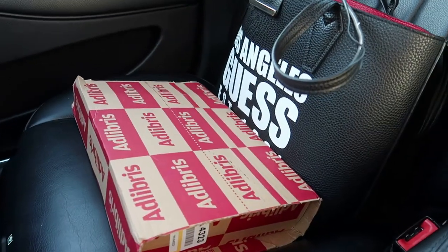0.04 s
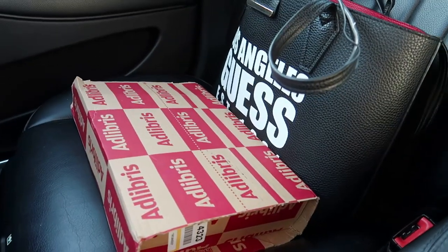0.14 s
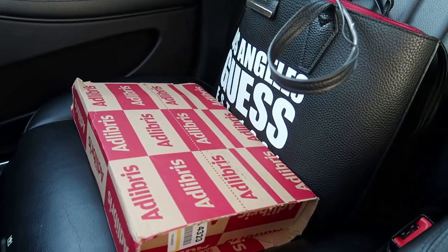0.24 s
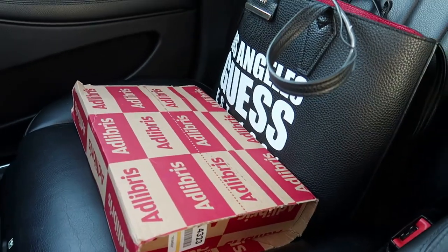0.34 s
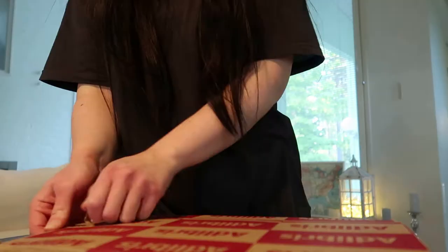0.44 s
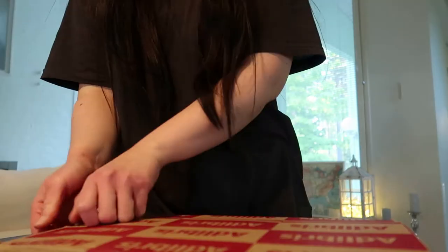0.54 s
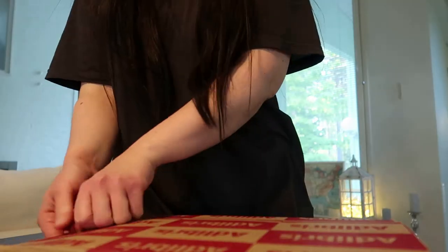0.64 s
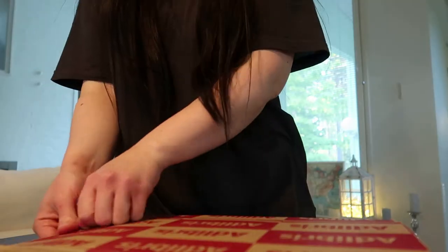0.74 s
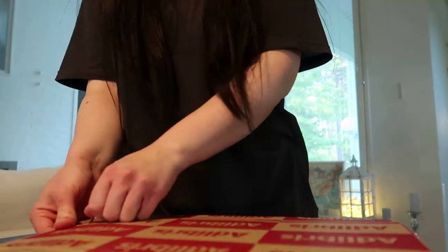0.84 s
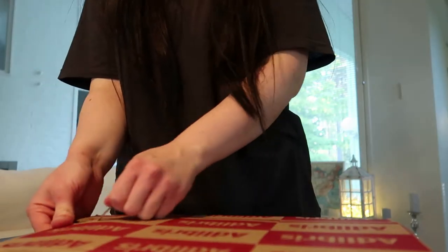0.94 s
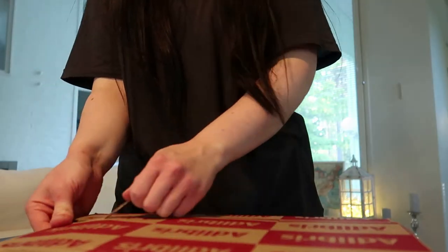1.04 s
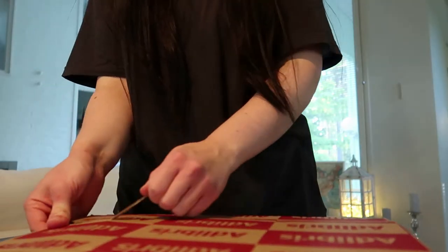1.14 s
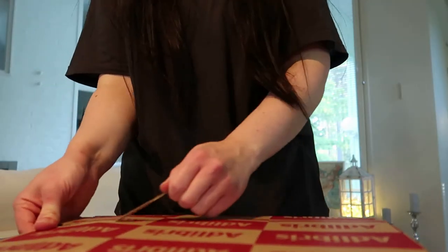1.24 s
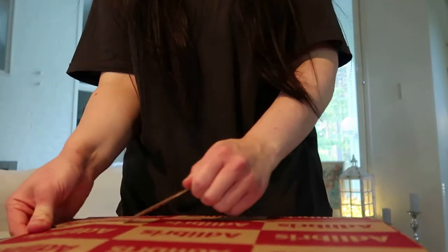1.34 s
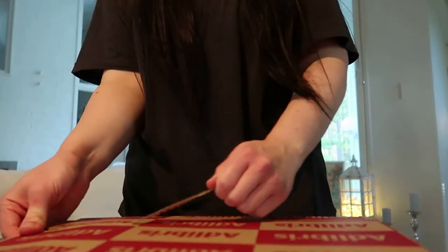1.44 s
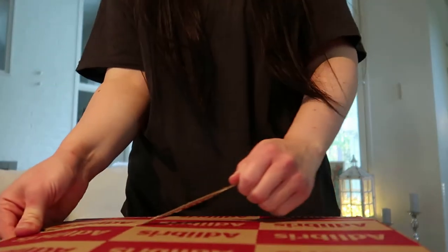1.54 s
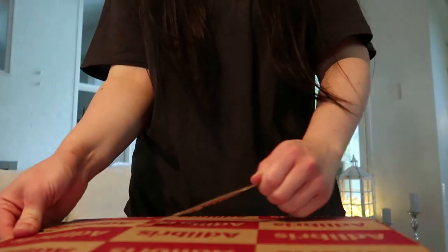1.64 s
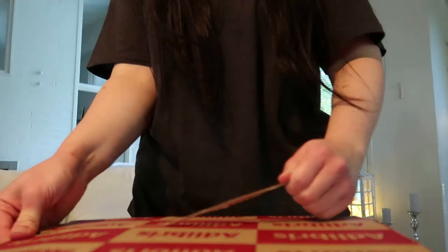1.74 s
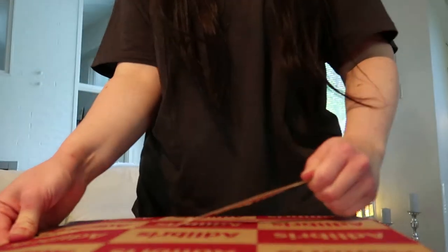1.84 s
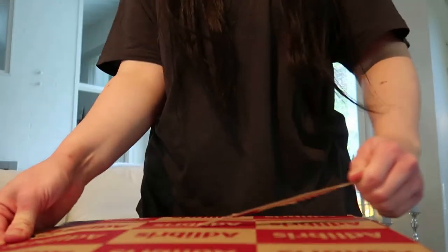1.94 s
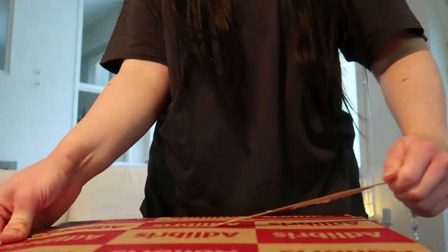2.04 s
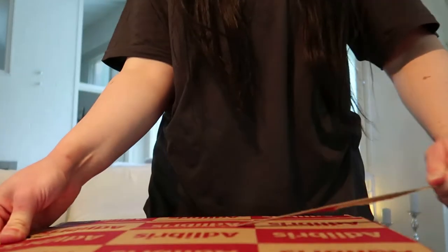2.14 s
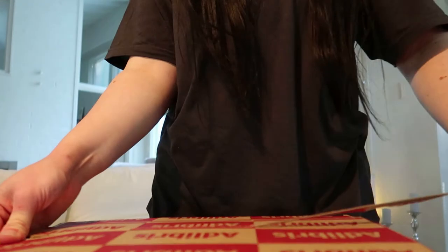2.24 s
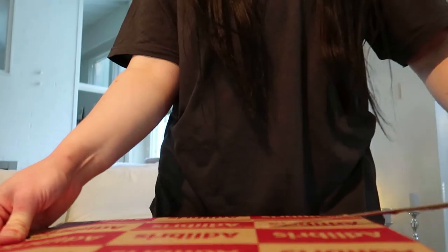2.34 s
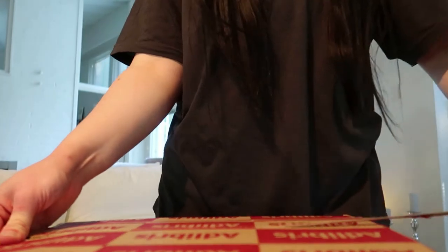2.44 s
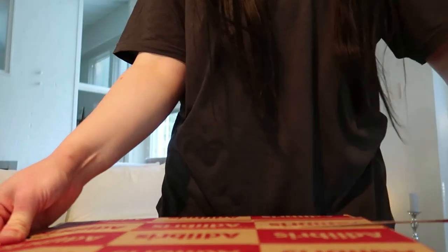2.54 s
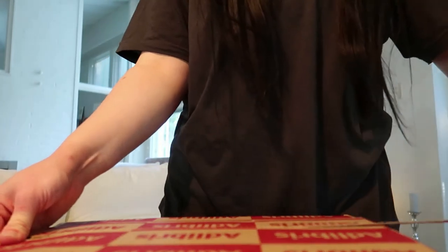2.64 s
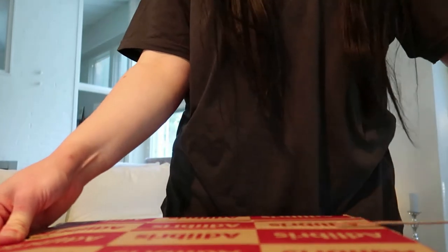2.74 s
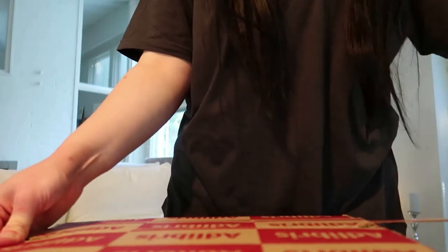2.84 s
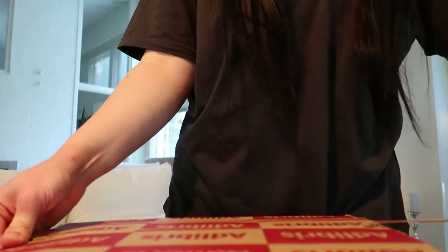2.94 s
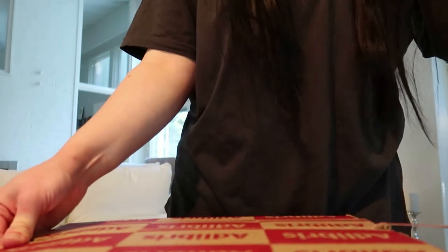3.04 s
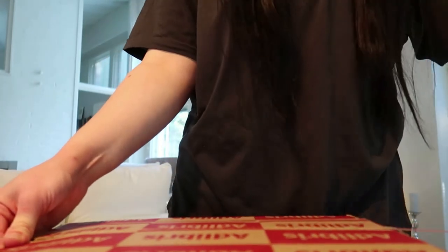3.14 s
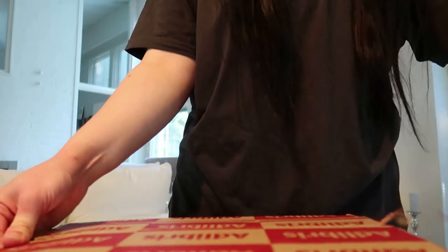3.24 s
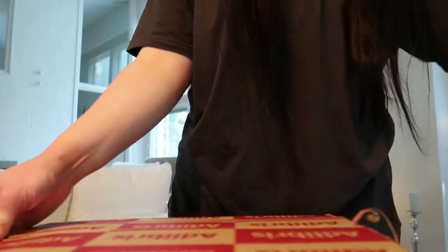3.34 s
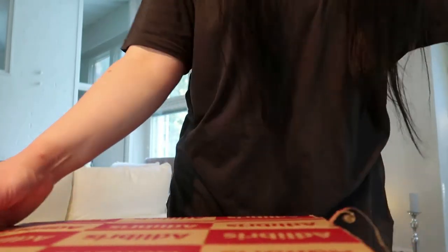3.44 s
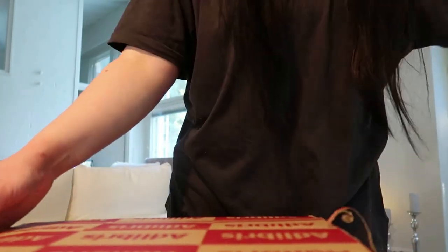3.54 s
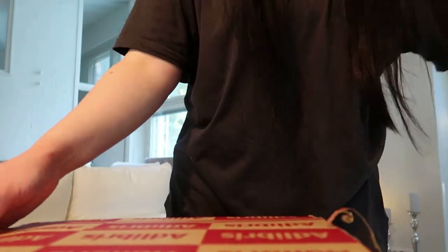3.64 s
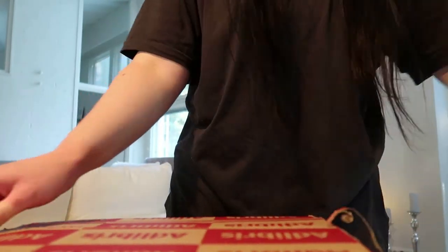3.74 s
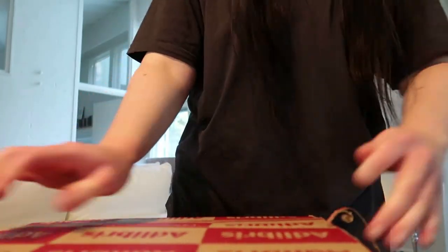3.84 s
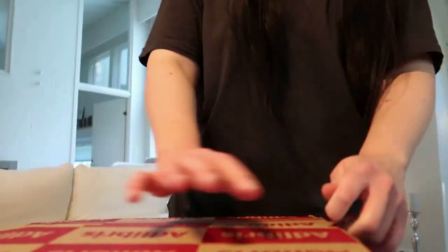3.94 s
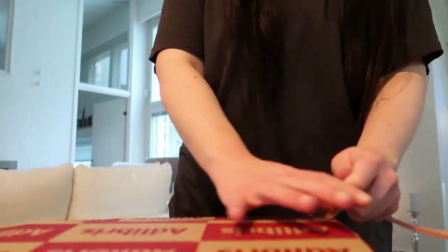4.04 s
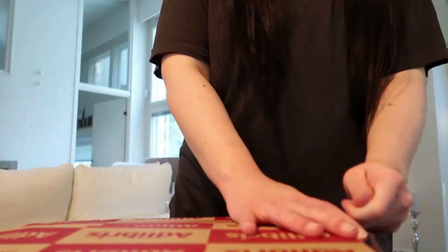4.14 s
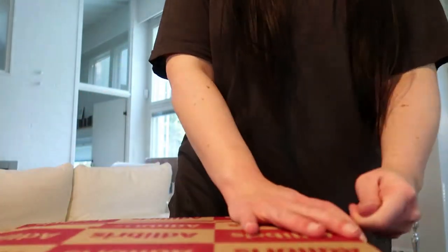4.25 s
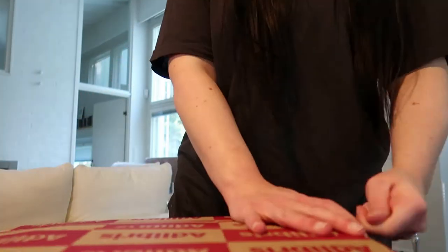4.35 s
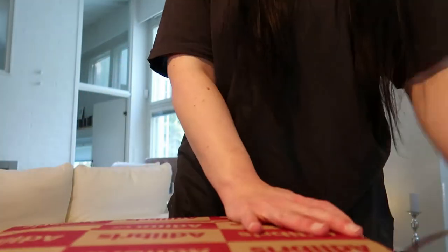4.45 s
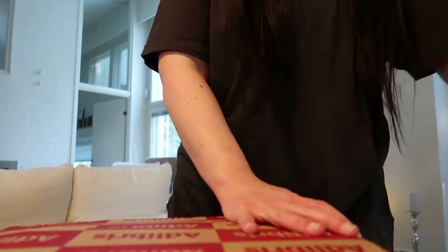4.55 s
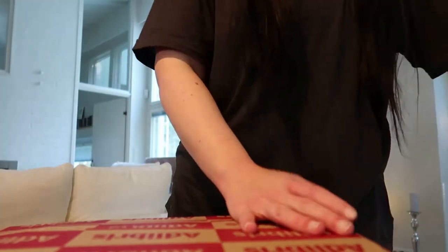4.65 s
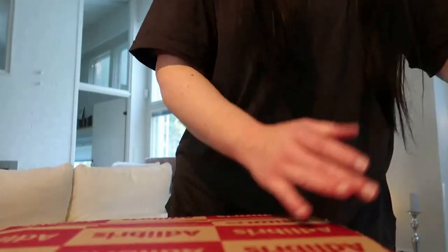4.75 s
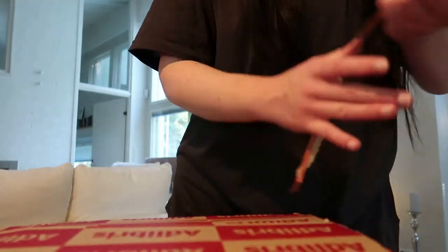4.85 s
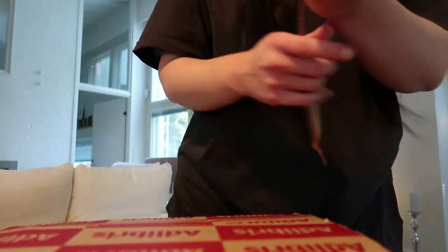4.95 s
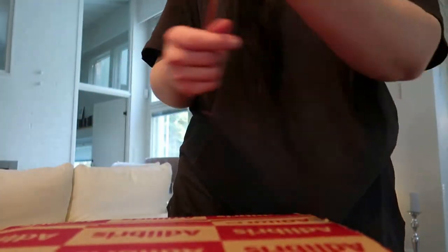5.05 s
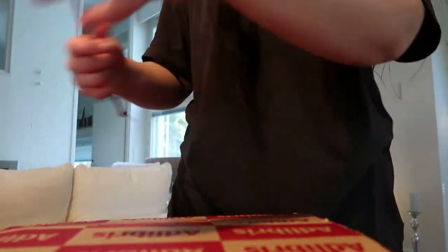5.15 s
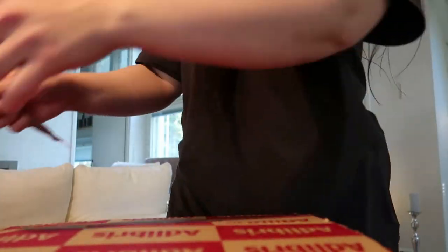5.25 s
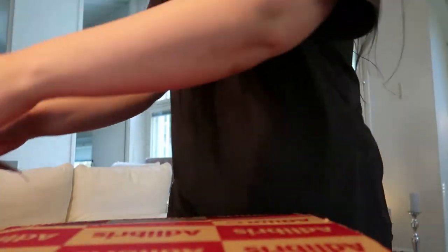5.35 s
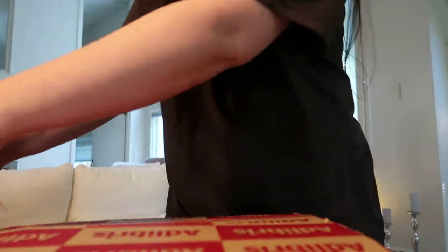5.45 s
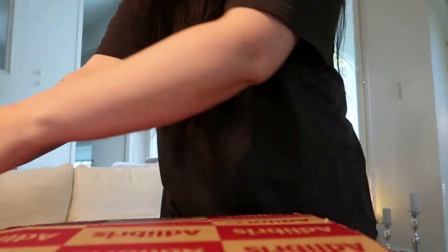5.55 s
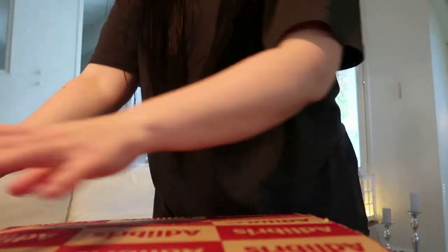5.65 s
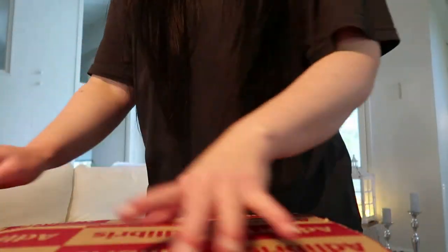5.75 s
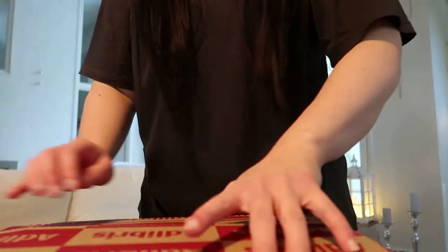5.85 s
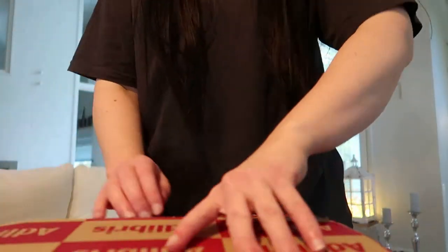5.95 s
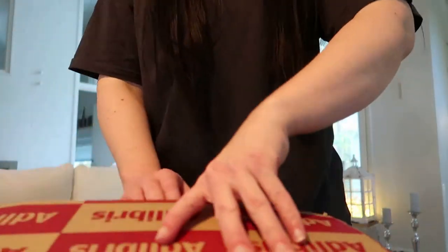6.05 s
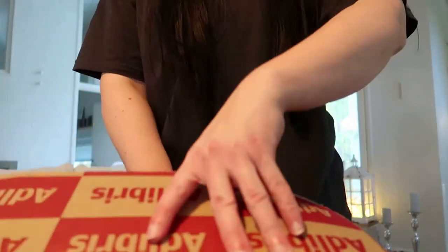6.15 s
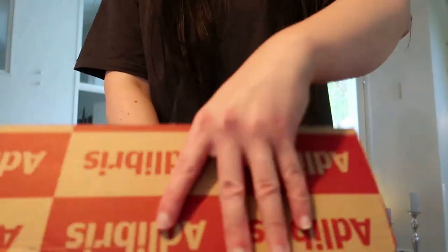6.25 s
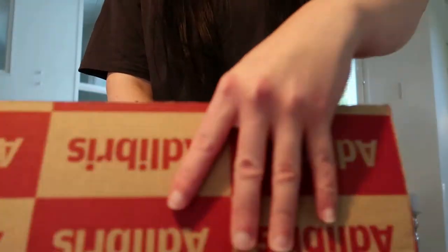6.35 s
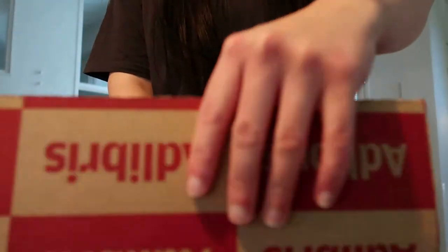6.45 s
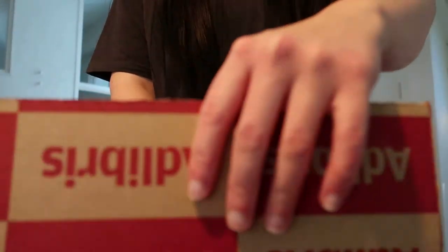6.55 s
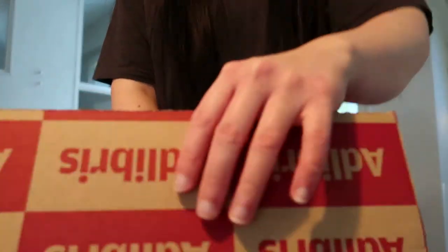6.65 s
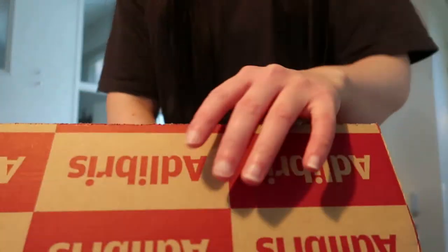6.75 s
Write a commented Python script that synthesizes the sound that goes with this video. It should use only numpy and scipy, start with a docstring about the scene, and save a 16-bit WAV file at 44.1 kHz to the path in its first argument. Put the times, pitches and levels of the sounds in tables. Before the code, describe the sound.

From 0 to 0.48 s a car idles: low, steady hum with slight whines and one soft low bump. It cuts abruptly to a quiet living room with faint air and mains hum. Fingers rub and tap cardboard lightly, with a stronger knock at about 1.03 s. From 1.0 to 2.7 s a tear strip is pulled loudly: dense dry snaps in uneven jerks, fibrous crackle, gliding hollow resonances and low lid drumming, becoming finer and thinner after 2 s. A quick bright rip comes at 2.8 s, with last tugs and sharp cracks to 3.25 s. Then soft sliding and small taps, a crisp hard knock at 4.48 s, and sparse quiet handling. Around 6.0 to 6.3 s the box edge drags and it lands with a very loud, close, hollow thump, shuddering briefly. Faint rubbing and a light tap end it. Close stereo microphone, modest diffuse reverberation.

```python
"""The hum of an idling car is heard for half a second, then a quiet living room where a cardboard box is torn open.
Board bridges of the tear strip snap over crackling fibres, exciting gliding resonances of the box;
a quick bright rip and last tugs follow. Sliding hands are trains of grains, knocks are struck pulses,
and the box is turned over with a thump close to the microphone. Filtered noise adds air and diffuse echoes."""
import sys
import numpy as np
from scipy import signal
from scipy.fft import rfft, irfft
from scipy.io import wavfile
from scipy.ndimage import uniform_filter1d

SR = 44100
rng = np.random.default_rng(int(sys.argv[2]) if len(sys.argv) > 2 else 0)


def store_wav(level_fs):
    """Save 16-bit WAV to argv[1]."""
    pcm = np.round(np.clip(np.atleast_2d(level_fs), -1, 1) * 32767)
    wavfile.write(sys.argv[1], SR, pcm.T.astype(np.int16))


N = 299876
T = np.arange(N) / SR

# Engine orders and whines in the car. Each row: frequency in Hz, mean level in dB rms.
ENGINE_TONES = [(78.7, -45), (118.2, -39.5), (138.4, -49.5), (236.5, -48), (354.5, -45), (380, -47.5),
                (673, -53.5), (754.5, -42.5), (827, -51.5), (1362, -55.5), (1513, -49), (1567, -68),
                (1620, -48.5), (1674, -53), (2051, -53)]
# Spectrum of the car's noise. Each row: frequency in Hz, relative level in dB.
CAR_COLOUR = [(18, -94), (30, -38), (62, -26), (122, -7.5), (171, -12.5), (320, -5.5), (364, -7),
              (485, -18.5), (774, -9), (1200, -25.5), (1650, -15), (1780, -24), (2030, -22), (2990, -30.5),
              (15000, -53.5)]
# Spectrum of the living room's quiet air. Each row: frequency in Hz, relative level in dB.
AIR_COLOUR = [(25, -2), (49, 7), (80, -2.5), (150, 1), (260, -4), (350, -2), (460, 0.5), (650, -12),
              (950, -10.5), (1300, -14), (3600, -23), (9000, -41.5), (15000, -57)]
# Steady mains tones of the room. Each row: frequency in Hz, level in dB before the swell.
HUM_TONES = [(100, -50)]
# Swell and fading of that hum. Each row: time in seconds, gain in dB.
HUM_SWELL = [(0.4, -14), (3.2, -34), (3.8, -1), (6.1, -6), (6.5, -26.5), (6.8, -21)]
# Reverberation of the living room. Each row: frequency in Hz, t60 in seconds.
ROOM_DECAY = [(80, 0.083), (300, 0.4), (1500, 0.16), (4000, 0.33), (12000, 0.53)]
# Hands and strip slide on the board. Each row: start in seconds, length in seconds, then relative levels
# in dB of rubbing, hiss and panel drumming, and swell over the stroke in dB.
STROKES = [(0.498, 0.1, -46.5, -52, -48, 5.5), (0.703, 0.055, -42.5, -48.5, -52, 0),
           (0.828, 0.023, -42.5, -50, -52, 1), (0.927, 0.12, -33.5, -37.5, -39, 8),
           (2.897, 0.26, -40, -58, -36, -7), (3.259, 0.08, -47, -73, -37, 14.5),
           (3.394, 0.13, -31, -51, -31.5, -0.5), (3.564, 0.17, -51, -61, -36, -1),
           (3.833, 0.026, -56, -58, -36.5, -1), (4, 0.019, -57, -67, -68, -2),
           (4.046, 0.014, -66, -53, -69, -10), (4.103, 0.11, -45.5, -61, -36.5, -4),
           (4.204, 0.038, -42.5, -54, -37.5, 5), (4.274, 0.14, -45.5, -60, -51, 10),
           (4.465, 0.01, -33, -44, -38, -2), (4.522, 0.087, -40.5, -71, -41.5, -3),
           (4.705, 0.032, -48.5, -59, -63, 0), (4.758, 0.064, -52, -48, -71, 4.5),
           (5.03, 0.11, -56.5, -51.5, -47, 6.5), (5.224, 0.16, -68, -58.5, -68, -3),
           (5.624, 0.14, -51, -63, -66, -13), (5.858, 0.091, -40, -45, -43, -3.5),
           (6.015, 0.063, -37, -64, -42, 3), (6.109, 0.058, -39.5, -46.5, -37.5, -3),
           (6.191, 0.11, -35.5, -51, -38, 7), (6.35, 0.14, -39.5, -57, -60, -1),
           (6.527, 0.02, -45.5, -58, -70, 11.5), (6.678, 0.3, -50, -80, -79, -1)]
# Spectra of rubbing, of hiss and of the drumming panel. Each row: frequency in Hz, relative level in dB.
RUB_COLOUR = [(290, -16), (500, -6), (801, 1.5), (1180, -4.5), (1680, -0.5), (2960, -1.5), (3550, -4),
              (4980, -17), (7970, -24), (9000, -67), (11700, -95), (19800, -120)]
HISS_COLOUR = [(2500, -4.5), (4500, 4), (7500, -4), (10000, -4.5), (13000, -13), (16000, -33)]
DRUM_COLOUR = [(53, -26), (90, -1), (135, -10.5), (280, -6.5), (361, -11), (497, -12.5), (800, -23),
               (1040, -61), (1760, -120)]
# Fingers and hands tap the box. Each row: time in seconds, relative crack level in dB,
# crack centre in Hz, relative thud level in dB.
TAPS = [(0.572, -26.5, 2380, -32), (0.673, -26, 1010, -31), (0.827, -28, 2200, -31),
        (0.982, -16, 2700, -46), (1.0325, -6, 2380, -8), (3.335, -19.5, 2530, -49), (3.347, -21, 2410, -17),
        (3.782, -32.5, 1760, -32), (4.003, -40, 2920, -59), (4.187, -26, 1810, -18),
        (4.208, -34, 1300, -19), (4.258, -30, 2200, -30), (4.371, -36, 4500, -59), (4.4837, -2, 2530, -8.5),
        (4.496, -37, 2600, -17), (4.824, -29, 3200, -59), (4.941, -37, 1990, -35),
        (5.296, -28.5, 3360, -58), (5.6108, -17, 1850, -33), (5.615, -25, 1340, -44),
        (5.784, -35.5, 3300, -40), (5.845, -39, 1400, -34), (5.9545, -21.5, 1680, -28),
        (6.648, -41, 7800, -74), (6.713, -19.5, 3400, -65)]
# The end of the strip cracks off the box. Each row: time in seconds, relative crack level in dB,
# crack centre in Hz, relative thud level in dB.
END_CRACKS = [(3.097, -11.5, 3200, -44), (3.1305, -11, 3100, -41), (3.142, -17, 3000, -33),
              (3.153, -12, 2720, -41), (3.196, -7.5, 1940, -31), (3.2041, -10.5, 2320, -21),
              (3.215, -9, 2500, -34), (3.2243, -2, 1450, -10), (3.2257, -6.5, 970, -25)]
# The box lands on its side, edge first and then its whole weight. Each row: time in seconds,
# relative crack level in dB, crack centre in Hz, relative thud level in dB.
THUMP = [(6.3042, 7.5, 1700, 2), (6.3056, 9.5, 2100, -1.5), (6.3068, -0.5, 1040, 3)]
# Spectra of the thud and of the lid's clatter. Each row: frequency in Hz, relative level in dB.
THUD_COLOUR = [(40, -28), (90, -9.5), (170, 4), (260, 5), (340, -3), (480, -6), (740, -8.5), (1200, -16.5),
               (3000, -16.5), (9000, -45)]
CLATTER_COLOUR = [(80, -9), (250, -12.5), (500, 14), (900, 6), (1300, -2.5), (2200, -19), (4000, -28),
                  (9000, -45)]
# Filtering of knock cracks by the soft paper. Each row: frequency in Hz, gain in dB.
PAPER_SURFACE = [(1000, -2.5), (3900, -1), (4900, -10), (7500, 2), (14000, -2)]
# Panel and air modes of the box. Each row: frequency in Hz, relative level in dB, t60 in seconds.
BOX_MODES = [(75.4, -25, 0.4), (120, -69, 0.077), (186, -29, 0.15), (275.5, -23.5, 0.072),
             (322, -29.5, 0.14), (463, -28.5, 0.12), (776, 0, 0.0049), (990, -31, 0.011),
             (1318, -15, 0.028), (1676, -11.5, 0.02), (2150, -8.5, 0.01), (3300, -33, 0.0017),
             (3490, -15, 0.019)]
# The pull on the strip. Each row: time in seconds, relative levels in dB of popping board and of fibres.
PULL = [(0.921, -57, -40), (0.975, -33, -32), (1.0, -21.5, -32.5), (1.17, -22, -30), (1.254, -15.5, -26),
        (1.316, -21.5, -25), (1.51, -14.5, -31), (1.57, -28, -21), (1.6, -16.5, -45), (1.696, -28.5, -24),
        (1.736, -25, -39), (1.876, -18, -32), (1.925, -22, -28), (1.953, -11.5, -34), (2.032, -20.5, -20.5),
        (2.138, -21, -26.5), (2.228, -18, -20.5), (2.28, -24, -35), (2.315, -27, -20.5), (2.365, -18, -26),
        (2.43, -25.5, -25.5), (2.638, -30, -28), (2.72, -52, -49)]
# Spectra of breaking board and parting fibres. Each row: frequency in Hz, relative level in dB.
BOARD_COLOUR = [(25, 16), (55, -13.5), (110, 4.5), (180, 1), (300, 3), (600, 2.5), (760, -4.5),
                (1100, -2.5), (2200, -5), (3600, -9), (5400, -80), (7500, -39), (11500, -24), (15500, -54)]
FIBRE_COLOUR = [(200, -8), (500, -10), (1170, -5), (1700, -2), (2450, -3), (3100, -0.5), (3700, -10),
                (4400, -11), (5400, -15), (7500, -13.5), (9500, -23), (12000, -21.5), (15500, -32)]
# The strip gives in jerks: a loud snap, in the longer rows followed by a run of weaker ones. Each row:
# time in seconds, relative level in dB, length of the run in seconds, pitch of the freed wall in Hz.
JERKS = [(1.002, -4, 0.02, 1080), (1.032, -2, .004, 1290), (1.06, -14, 0.013, 1500),
         (1.0992, -9.5, 0.011, 1140), (1.127, -5, .004, 1260), (1.142, -12, .004, 1650),
         (1.16, -19, 0.014, 866), (1.1966, -5.5, 0.018, 2070), (1.2164, -6.5, 0.013, 740),
         (1.2474, -7.5, 0.0036, 2600), (1.2583, -3.5, 0.015, 1280), (1.2829, -7, 0.034, 754),
         (1.3265, -6.5, 0.014, 696), (1.3786, -7, 0.0096, 730), (1.397, -3.5, 0.016, 1570),
         (1.4218, -3, 0.012, 680), (1.466, -5.5, 0.016, 790), (1.487, -5, .004, 1020),
         (1.5003, -5, 0.023, 740), (1.544, -10, 0.0044, 736), (1.56, -17, .004, 750),
         (1.583, -7, 0.0028, 800), (1.592, -7, .004, 864), (1.6068, -0.5, 0.0036, 800),
         (1.617, -10.5, 0.022, 920), (1.6502, -5, 0.0068, 540), (1.672, -13.5, .004, 900),
         (1.689, -12, .004, 800), (1.707, -12.5, .004, 790), (1.717, -5.5, 0.011, 503),
         (1.7401, -3.5, 0.034, 840), (1.791, -5.5, 0.0063, 730), (1.802, -5.5, .004, 925),
         (1.814, -6.5, 0.013, 890), (1.842, -8, .004, 860), (1.850, -8.5, .004, 806),
         (1.8624, -5, 0.0095, 860), (1.9519, -3.5, 0.0064, 880), (1.9689, -10, 0.024, 930),
         (2.001, -8.5, 0.0051, 930), (2.014, -3.5, 0.018, 950), (2.0424, -5.5, .004, 970),
         (2.2415, -12, 0.005, 640), (2.252, -4, .004, 1340), (2.264, -14, .004, 1100),
         (2.2908, -8.5, .002, 1090), (2.3213, -13.5, .002, 865), (2.3746, -10, 0.023, 970),
         (2.4993, -12.5, 0.011, 764), (2.557, -15, 0.0018, 700), (2.865, -9, .002, 1730),
         (2.876, -6, .002, 1000), (2.8854, -7.5, .002, 905)]
# Pace of the lesser pops along the strip. Each row: time in seconds, pops per second.
POP_RATE = [(1.0, 95), (1.8, 105), (2.1, 260), (2.4, 300), (2.65, 170)]
# Resonances that glide as the slit grows. Each row: time in seconds, then the frequencies in Hz of the
# middle resonance, the spectral hollow, the deep resonance and the torn edge.
SLIT = [(1.0, 1190, 4350, 115, 3240), (1.12, 905, 4000, 109, 4040), (1.3, 717.2, 3300, 108, 3930),
        (1.6, 768, 2570, 143, 4150), (2.0, 880, 2300, 193, 3500), (2.3, 903, 2020, 172, 3640),
        (2.8, 720, 2530, 79, 3970)]
# Strength of the middle resonance. Each row: time in seconds, gain in dB.
VOICE_LEVEL = [(.9, -11), (1.6, 6.5), (2.1, -3), (2.27, 9.5), (2.45, 1.5), (2.7, -0.5), (3.6, -20)]
# The lid drums under the tear. Each row: time in seconds, relative levels in dB of panel and pumped air.
LID = [(.98, -55, -48), (1.15, -34, -38), (1.28, -22, -41), (1.5, -24.5, -29), (1.68, -35, -38),
       (1.77, -25.5, -28), (1.9, -29, -37), (2.03, -18.5, -38), (2.14, -32.5, -35), (2.24, -24, -41),
       (2.36, -43, -30), (2.62, -35.5, -26), (2.75, -46, -35)]
# The box flexes in the last tugs. Each row: time in seconds, relative levels in dB of popping and pumped air.
FLEXES = [(2.885, -21.5, -29), (3.138, -21.5, -20), (3.217, -26.5, -31.5), (3.349, -42, -24),
          (3.42, -58, -41)]
# The edge of the box drags in slips as it is tipped up. Each row: start in seconds, length in seconds,
# pitch of its hollow in Hz, relative level in dB.
DRAGS = [(6.008, 0.058, 220, -35.5), (6.115, .03, 317, -37), (6.187, 0.052, 298, -34),
         (6.268, .035, 380, -31.5)]
# Spectrum of the box shuddering as it settles. Each row: frequency in Hz, relative level in dB.
SHUDDER_COLOUR = [(40, -14), (75, -6), (130, -7), (220, 0), (330, 4.5), (450, 0), (650, -14), (1100, -7),
                  (1900, -14), (8000, -59)]
# Sideways pickup of the microphone pair. Each row: frequency in Hz, filter gain in dB.
SIDE_PICKUP = [(50, -37), (250, -26), (600, -22), (1200, -17), (2000, -19.5), (2700, -16.5), (3700, -6.5),
               (5500, 0), (8000, -3), (10500, 7.5), (15000, 5.5)]
# Partial cancellation of the two ports in the top treble. Each row: frequency in Hz, gain in dB.
PORT_DIP = [(8000, -2.5), (9200, -4), (10200, -18.5), (11500, -6), (13000, -1.5)]
# The bearing of the close sounds. Each row: time in seconds, samples by which the left port lags,
# left minus right in dB.
BEARING = [(0.5, -1.2, 1.1), (1.25, -1.4, .5), (1.75, -.8, .6), (2.25, 0, .2), (2.8, 1.3, -1),
           (3.3, 1, -.4), (4.6, .8, -.2), (5.2, -.9, .3), (5.7, 0, 1.2), (6.2, 0, 0)]

CAR_ENDS_S, CAR_DB, ROOM_AIR_DB = 0.481, -37, -51
STROKE_ATTACK_S, STROKE_RELEASE_S = 0.032, 0.072   # times for 20 dB
BRIDGES_PER_S, RUN_LOSS_DB, RUN_SPREAD_DB = 92, -3, 4   # the snaps within a run
FLAP_DB, FLAP_DECAY_S = -7.5, 0.0016   # the freed wall rings
CHIP_DB, CHIP_DECAY_S = -15, 0.0018   # so does the broken edge, higher
SUCTION_DB, SUCTION_S = -12, 0.00082   # air rushes into the opened flute
POPS_DB, CRACKLE_DB, SPLINTERS_DB, END_CRACKLE_DB = -4, -7, -9, -6
RIP_S, RIP_LENGTH_S, RIP_DB = 2.822, 0.047, -17.5
RIP_LEAD_S, RIP_ATTACK_S, RIP_RELEASE_S = 0.028, 0.024, 0.024   # softer start; times for 20 dB
OVERTONE_RATIO, OVERTONE_DB = 2.48, -11.5   # upper partner of the middle resonance


def from_db(db):
    """Decibels express amplitude as a logarithmic ratio; this returns the gain."""
    return 10 ** (np.asarray(db) / 20)


def rms_one(x):
    """Root-mean-square normalisation to 1."""
    return x / np.sqrt(np.mean(x ** 2) + 1e-20)


def gains(rows):
    """Linear interpolation in dB gives each column as a gain in time, silent outside its rows."""
    s, *columns = np.transpose(rows)
    inside = (T >= s[0]) * (T <= s[-1])
    return [from_db(np.interp(T, s, column)) * inside for column in columns]


def at_hz(points, hz):
    """A spectrum is interpolated on a logarithmic frequency axis."""
    f, value = np.transpose(points)
    return np.interp(np.log(hz), np.log(f), value)


def response(points, size=4096):
    """Folding the cepstrum of a spectrum yields its causal, minimum-phase impulse response."""
    hz = np.maximum(np.arange(size // 2 + 1) * SR / size, 1)
    cepstrum = irfft(np.log(from_db(at_hz(points, hz))))
    cepstrum[1:size // 2] *= 2
    cepstrum[size // 2 + 1:] = 0
    return irfft(np.exp(rfft(cepstrum)))


def through(x, ir):
    """A linear system acts by convolution with its impulse response."""
    return signal.oaconvolve(x, ir)[:N]


def drift(rate):
    """Slow random wandering: normal knots of spread 1, joined by lines, at a rate per second."""
    knots = rng.standard_normal(int(N / SR * 400) + 2)
    return np.interp(T * rate, np.arange(len(knots)), knots)


def noise(colour):
    """White noise shaped by a spectrum, rms 1."""
    return rms_one(through(rng.standard_normal(N), response(colour)))


def grains(per_s, spread_db):
    """Sparse random impulses model tiny fractures of unequal size."""
    sizes = from_db(spread_db * np.minimum(rng.exponential(1, N), 4))
    return (rng.random(N) < per_s / SR) * sizes * rng.choice([-1, 1], N)


def add(out, s, sound, db):
    """Superposition of a sound on a track at a given time and level."""
    i = int(s * SR)
    out[i:i + len(sound)] += (from_db(db) * sound)[:N - i]


def envelope(s, hold_s, attack_s, release_s, swell_db=0):
    """Exponential attack, a hold that may swell, and release; attack and release are times for 20 dB."""
    outside = np.maximum(s - T, 0) / attack_s + np.maximum(T - s - hold_s, 0) / release_s
    swell = swell_db * (np.clip((T - s) / hold_s, 0, 1) - .5)
    return from_db(swell - 20 * np.minimum(outside, 10))


def moving_band(x, hz, width_hz, size=256):
    """A two-pole resonance of gain 1 at a gliding centre, updated block by block."""
    r, out, state = np.exp(-np.pi * width_hz / SR), np.zeros(N), np.zeros(2)
    zeros = np.array([1, 0, -1]) * (1 - r * r) / 2
    for i in range(0, N, size):
        poles = [1, -2 * r * np.cos(2 * np.pi * hz[i] / SR), r * r]
        out[i:i + size], state = signal.lfilter(zeros, poles, x[i:i + size], zi=state)
    return out


def fixed_band(x, hz, width_hz):
    """A resonance of gain 1 at a constant centre."""
    return moving_band(x, np.full(N, hz), width_hz)


def swing(s, hz, db, t60):
    """A damped low mode, struck once; it takes about half a cycle to get going."""
    t = np.maximum(T - s, 0)
    onset = 1 - np.exp(-2 * hz * t)
    decay = np.exp(-np.log(1000) * np.minimum(t / t60, 10))
    return from_db(db) * np.sin(2 * np.pi * hz * t) * onset * decay


def idling_car():
    """Harmonic and whining sines, unsteady in level and phase, stand over noise and one soft low bump."""
    engine = 0
    for hz, db in ENGINE_TONES:
        level = from_db(db + 3.6 * drift(14.65)) * np.sqrt(2)
        engine = engine + level * np.sin(2 * np.pi * (hz * T + rng.random()) + 0.18 * drift(9.9))
    bump = swing(0.035, hz=135, db=-16, t60=0.12)
    return engine + from_db(CAR_DB) * noise(CAR_COLOUR) + bump


def quiet_room():
    """Broadband air noise combines with a swelling mains tone and a faint narrow-band whir."""
    hum = sum(from_db(db) * np.sqrt(2) * np.sin(2 * np.pi * hz * T) for hz, db in HUM_TONES)
    whir = rms_one(fixed_band(noise(AIR_COLOUR), 473, width_hz=11))
    return from_db(ROOM_AIR_DB) * noise(AIR_COLOUR) + hum * gains(HUM_SWELL)[0] + from_db(-67.5) * whir


def background():
    """A linear crossfade of a few milliseconds passes from the car to the living room."""
    indoors = np.clip((T - CAR_ENDS_S) / 0.0036 + .5, 0, 1)
    return idling_car() * (1 - indoors) + quiet_room() * indoors


def room(x, size=26000):
    """Diffuse reverberation: bands of noise decay exponentially, each with its own t60."""
    t, edges = np.arange(size) / SR, np.geomspace(50, 16000, 9)
    tail = 0
    for low, high in zip(edges, edges[1:]):
        band_filter = signal.butter(2, [low, high], "band", fs=SR, output="sos")
        band = signal.sosfilt(band_filter, rng.standard_normal(size))
        tail = tail + band * np.exp(-np.log(1000) * t / at_hz(ROOM_DECAY, np.sqrt(low * high)))
    tail = tail * np.clip((t - .003) / 0.0017, 0, 1)   # reflections begin after 3 ms
    return through(x, tail / np.linalg.norm(tail))


def splinters(per_s, cycles, low_hz, high_hz, count=16):
    """Impulsive excitation of many resonators: tiny breaks ring a few cycles at separate pitches; rms 1."""
    out = 0
    for hz in np.geomspace(low_hz, high_hz, count):
        r, w = from_db(-60 * hz / (cycles * SR)), 2 * np.pi * hz / SR
        breaks = grains(per_s / count, spread_db=3.5) + 1e-18
        out = out + signal.lfilter([1, 0, -1], [1, -2 * r * np.cos(w), r * r], breaks) * np.sqrt(hz)
    return rms_one(out)


def sliding():
    """Stick-slip friction: skin and paper catch in fine grains, grip unevenly and set the panel drumming."""
    rub, hiss, drum = sum(
        from_db(levels)[:, None] * envelope(s, length_s, STROKE_ATTACK_S, STROKE_RELEASE_S, swell)
        for s, length_s, *levels, swell in STROKES)
    grip = from_db(2 * drift(60) + 1.3 * drift(20))
    rub_grains = rms_one(through(grains(per_s=7700, spread_db=1.5), response(RUB_COLOUR)))
    hiss_grains = rms_one(through(grains(per_s=7000, spread_db=1.5), response(HISS_COLOUR)))
    # the sliding skin catches on the grain
    scuffs = splinters(per_s=160, cycles=14, low_hz=800, high_hz=3400)
    scuffs = signal.sosfilt(signal.butter(4, 4600, fs=SR, output="sos"), scuffs)
    out = rub * (from_db(-2) * rub_grains + from_db(-7) * scuffs)
    out += from_db(-5.5) * hiss * hiss_grains
    return grip * (out + from_db(-6.0) * drum * noise(DRUM_COLOUR))


def box(colour, ring_db, size=8192):
    """Modal superposition: the box answers a click with a direct pulse and its decaying modes."""
    t = np.arange(size) / SR
    modes = sum(from_db(db - 60 * t / t60) * np.cos(2 * np.pi * hz * t) for hz, db, t60 in BOX_MODES)
    ir = from_db(ring_db) * modes
    ir[0] += 1
    return signal.fftconvolve(ir, response(colour))[:size]


def contact(colour, crumple_s, spray_share=0.28, size=2048):
    """Impact excitation: one pulse and a decaying spray of small breaks drive a peak-normalised response."""
    t = np.arange(size) / SR
    spray = rng.standard_normal(size) * np.exp(-t / crumple_s) * (t > .0006) * spray_share
    spray[0] = 1
    return signal.fftconvolve(spray, colour / np.abs(colour).max())


def knocks(rows, crumple_s):
    """Impact radiation: a dry surface crack, a clattering lid and a thud of the hollow box."""
    out, thud, t = np.zeros(N), box(THUD_COLOUR, ring_db=-31.5), np.arange(4096) / SR
    surface, lid = response(PAPER_SURFACE), response(CLATTER_COLOUR)
    for s, crack_db, hz, thud_db in rows:
        colour = [(hz / 12, -24), (hz / 2, -5), (hz, 0), (hz * 1.7, -3), (hz * 2.6, -21), (hz * 7, -44)]
        crack = signal.fftconvolve(box(colour, ring_db=-24), surface)
        crack = from_db(1) * contact(crack, crumple_s, spray_share=.13)
        # the lid springs back in a dull clatter
        clatter = signal.fftconvolve(rng.standard_normal(len(t)) * np.exp(-t / 0.014), lid)
        clatter *= np.linalg.norm(crack) / np.linalg.norm(clatter)
        add(out, s, crack, crack_db)
        add(out, s, clatter, (crack_db + thud_db) / 2 - 6)
        add(out, s, -contact(thud, crumple_s / 2), thud_db)
    return out


def snap(board, fibre, flap_hz, size=1024):
    """Sudden release of stress: a bridge cracks, wall and edge ring, and air is sucked into the flute."""
    t = np.arange(size) / SR
    crack = from_db(-5) * contact(board, crumple_s=.0023)
    crack += from_db(rng.uniform(-15, -8.5)) * contact(fibre, crumple_s=.002)
    chip_hz = rng.uniform(1700, 4300)
    flap = from_db(FLAP_DB) * np.sin(2 * np.pi * flap_hz * t) * np.exp(-t / FLAP_DECAY_S)
    chip = from_db(CHIP_DB) * np.sin(2 * np.pi * chip_hz * t) * np.exp(-t / CHIP_DECAY_S)
    suction = np.exp(-(t / SUCTION_S - 2) ** 2)
    refill = t * np.exp(-t / .0022)
    refill *= suction.sum() / refill.sum()   # the net pressure is zero
    crack[:size] += flap + chip - from_db(SUCTION_DB) * (suction - refill)
    return crack


def jerks(board, fibre):
    """Progressive fracture: each jerk breaks one bridge, and the longer ones run on through the next few."""
    snaps = np.zeros(N)
    for s, db, run_s, flap_hz in JERKS:
        add(snaps, s, snap(board, fibre, flap_hz), db)
        steps, sizes = rng.standard_normal((2, 5))
        delays = np.cumsum(np.exp(.15 * steps) / BRIDGES_PER_S)
        for delay, size in zip(delays, sizes):
            reached = np.clip((run_s - delay) * BRIDGES_PER_S + .5, 0, 1)   # 0 beyond the run
            weaker = reached * snap(board, fibre, flap_hz * rng.uniform(0.52, 1.45))
            add(snaps, s + delay, weaker, db + RUN_LOSS_DB + RUN_SPREAD_DB * min(size, .5))
    return snaps


def popping(board, fibre, jitter, spread_db, count=560):
    """A random point process: lesser bridges break at uneven steps, smaller when denser; rms 1 overall."""
    start_s = PULL[0][0]
    out, s = np.zeros(N), start_s
    for step, size, pitch in rng.standard_normal((count, 3)):
        per_s = np.interp(s, *np.transpose(POP_RATE))
        s = min(s + np.exp(jitter * step) / per_s, T[-1])
        pop = snap(board, fibre, 950 * np.exp(.35 * pitch)) / np.sqrt(per_s)
        add(out, s, pop, spread_db * np.clip(size, -2, 1))
    return out / np.std(out[int(start_s * SR):int(s * SR)])


def crackling(fibre, fibre_gain, breaks):
    """Stress transfer: fibres part in fine and coarse grains, hardest just after each break of the board."""
    strain = signal.lfilter([.02], [1, -.98], np.abs(breaks)) ** 1.3
    strain = strain / (uniform_filter1d(strain, size=4000) + 1e-5)
    fine = from_db(CRACKLE_DB) * rms_one(through(grains(per_s=4400, spread_db=0.0), fibre))
    coarse = splinters(per_s=500, cycles=41, low_hz=1103, high_hz=4100)
    # the strip first bites through the liner
    bite = from_db(-26) * envelope(0.98, 0.057, attack_s=0.003, release_s=0.054)
    return (fine + from_db(SPLINTERS_DB) * coarse) * fibre_gain * strain + bite * coarse


def ripping(fibre):
    """Fusion of dense events: the strip runs out and its parting fibres merge into a bright rasp."""
    rip = through(grains(per_s=14000, spread_db=1.5), fibre)
    rip = rms_one(rip + from_db(2) * fixed_band(rip, 3850, width_hz=590))
    lead = from_db(-5) * envelope(RIP_S - RIP_LEAD_S, RIP_LEAD_S, attack_s=0.056, release_s=RIP_RELEASE_S)
    main = envelope(RIP_S, RIP_LENGTH_S, RIP_ATTACK_S, RIP_RELEASE_S)
    flutter = from_db(2.2 * drift(330))
    return from_db(RIP_DB) * rip * flutter * np.maximum(lead, main)


def slit_resonances(tear):
    """Resonant colouring: the growing slit adds gliding peaks, a moving hollow and a fixed panel dip."""
    s, voice_hz, hollow_hz, _, edge_hz = np.transpose(SLIT)
    voice_hz = np.interp(T, s, voice_hz)
    overtone_hz = OVERTONE_RATIO * voice_hz * np.exp(.05 * drift(14))
    voice = moving_band(tear, voice_hz, width_hz=130)
    voice = voice + from_db(OVERTONE_DB) * moving_band(tear, overtone_hz, width_hz=180)
    hollow = moving_band(tear, np.interp(T, s, hollow_hz), width_hz=180)
    edge = moving_band(tear, np.interp(T, s, edge_hz) * np.exp(0.12 * drift(9)), width_hz=380)
    slit = tear + gains(VOICE_LEVEL)[0] * voice - hollow + from_db(-0.5) * edge
    return slit - from_db(-7) * fixed_band(slit, 630, width_hz=39)


def lid_motion():
    """Plate vibration: the lid drums at its deep resonance and pumps the air in the box."""
    lid_gain, air_gain = gains(LID)
    puffs = sum(from_db(db) * envelope(s, hold_s=0.047, attack_s=.02, release_s=0.083) for s, _, db in FLEXES)
    air = noise([(25, -11), (50, -2.5), (75, -1.5), (110, -16), (200, -31.5), (600, -74)])
    s, _, _, deep_hz, _ = np.transpose(SLIT)
    drumming = moving_band(grains(per_s=270, spread_db=1.5), np.interp(T, s, deep_hz), width_hz=36)
    return lid_gain * rms_one(drumming) + from_db(-9.5) * (puffs + air_gain) * air


def tearing():
    """Source and resonator: breaking board and fibres excite the slit, while the lid moves below."""
    board, fibre = box(BOARD_COLOUR, ring_db=-17.5), box(FIBRE_COLOUR, ring_db=-43)
    pop_gain, fibre_gain = gains(PULL)
    flex = sum(from_db(db) * envelope(s, hold_s=0.003, attack_s=0.032, release_s=0.02) for s, db, _ in FLEXES)
    pops = popping(board, fibre, jitter=.25, spread_db=2.0) * (from_db(POPS_DB) * pop_gain + flex)
    breaks = jerks(board, fibre) + pops
    crackle = crackling(fibre, fibre_gain + from_db(END_CRACKLE_DB) * flex, breaks)
    return slit_resonances(breaks + crackle + ripping(fibre)) + lid_motion()


def tipping():
    """Friction-driven resonance: each slip of the edge has its own pitch; the box shudders after landing."""
    scrape = noise(DRUM_COLOUR)
    drags = 0
    for s, length_s, hz, db in DRAGS:
        hollow = rms_one(fixed_band(scrape, hz, width_hz=110))
        drags = drags + from_db(db) * hollow * envelope(s, length_s, attack_s=0.02, release_s=0.031)
    settling = envelope(THUMP[-1][0], 0.0034, attack_s=.002, release_s=0.15)
    return drags + from_db(-22) * noise(SHUDDER_COLOUR) * settling


def thumping():
    """Momentum transfer: the landing blow sets the big panel and the table under it swinging."""
    blow_s = THUMP[-1][0]
    panel = swing(blow_s, hz=311, db=13.5, t60=0.025)
    table = swing(blow_s, hz=81, db=-18, t60=0.15)
    return knocks(THUMP, crumple_s=0.0027) + panel + table


def scene():
    """Spatial coherence: two close ports hear the bass alike and differ more in the treble."""
    tear, rub = tearing(), sliding() + tipping()
    cracks, taps = knocks(END_CRACKS, crumple_s=0.0033), knocks(TAPS, crumple_s=0.003)
    thump = thumping()
    near = tear + rub + cracks + taps + thump
    send = from_db(-7.0) * tear + from_db(-8.0) * rub
    send = send + from_db(-12.5) * cracks + from_db(-14.5) * taps + from_db(-33) * thump
    mid = through(near + room(send), response(PORT_DIP)) + background()
    # near reflections off the box and table reach the two ports unequally
    scatter = rng.standard_normal(512) * np.exp(-np.arange(512) / SR / .004)
    scatter = scatter / np.linalg.norm(scatter)
    across = from_db(-8.0) * through(near, scatter) + from_db(-5.0) * room(send)
    side = through(across + from_db(ROOM_AIR_DB + 15.0) * noise(AIR_COLOUR), response(SIDE_PICKUP))
    s, lag, pan_db = np.transpose(BEARING)
    # a small delay is close to a share of the slope; the level difference acts above the bass
    delay = -.5 * np.interp(T, s, lag) * np.gradient(near)
    shaded = signal.sosfilt(signal.butter(1, 300, "high", fs=SR, output="sos"), near)
    side = side + delay + .5 * (from_db(np.interp(T, s, pan_db)) - 1) * shaded
    return np.array([mid + side, mid - side])


def record(dry):
    """Band-limiting and overload: deep bass is lost, peaks beyond full scale clip, and the top is cut."""
    dry = signal.sosfilt(signal.butter(2, 46, "high", fs=SR, output="sos"), dry)
    top_cut = signal.ellip(10, .1, 80, 15700, fs=SR, output="sos")
    return signal.sosfilt(top_cut, np.clip(dry, -1, 1))


dry = scene()
out = record(dry)
store_wav(out)
```